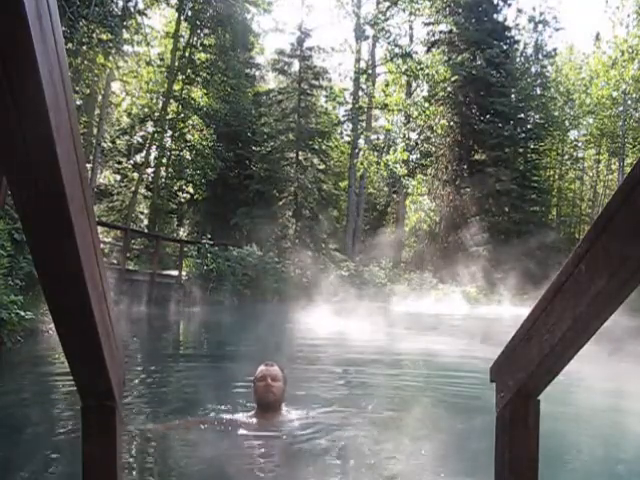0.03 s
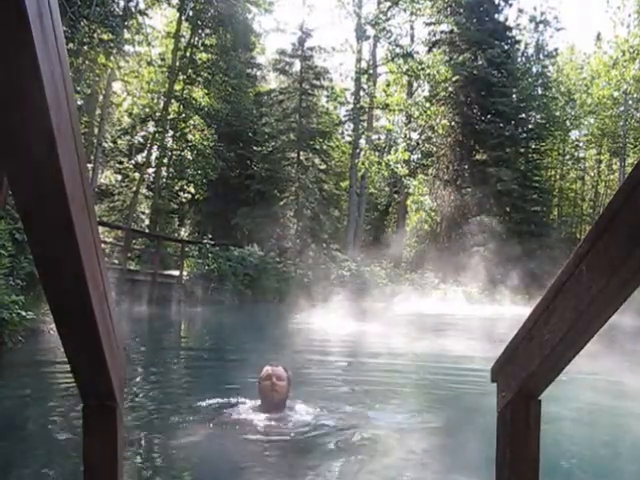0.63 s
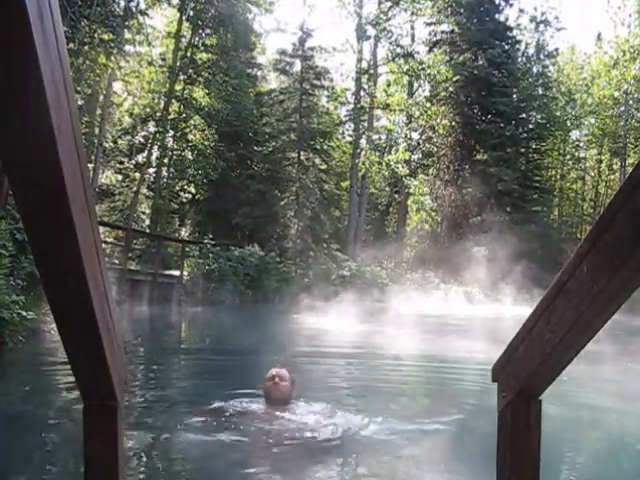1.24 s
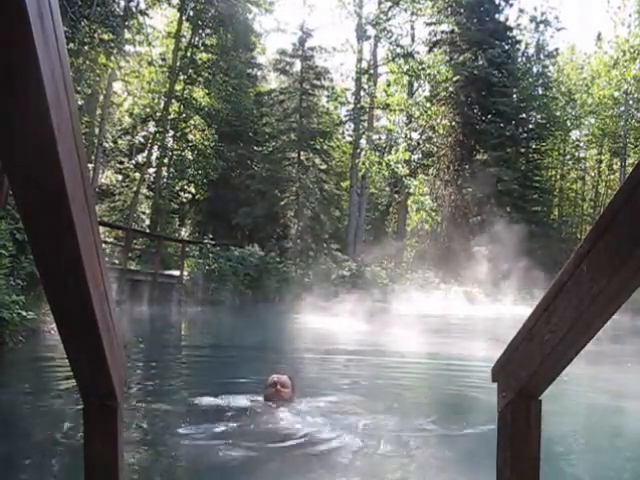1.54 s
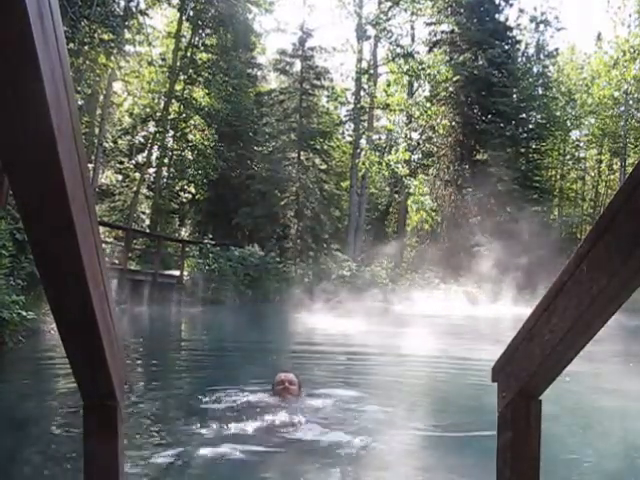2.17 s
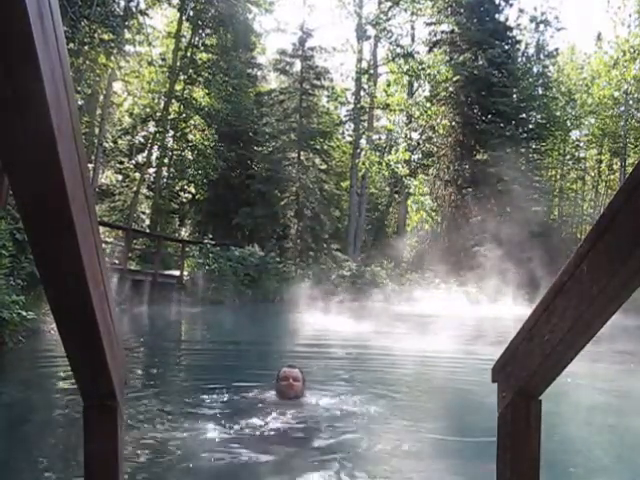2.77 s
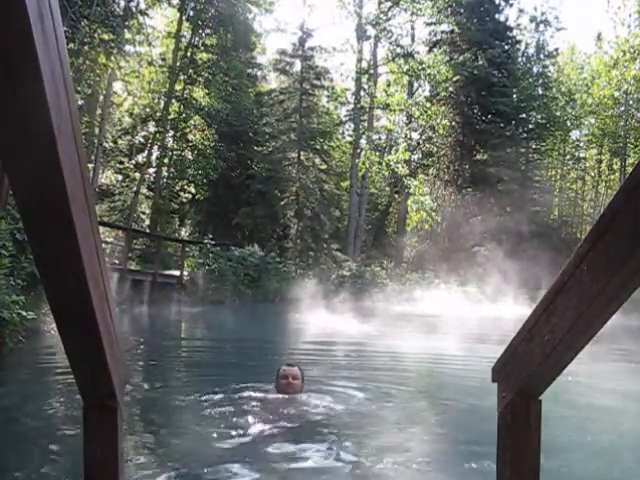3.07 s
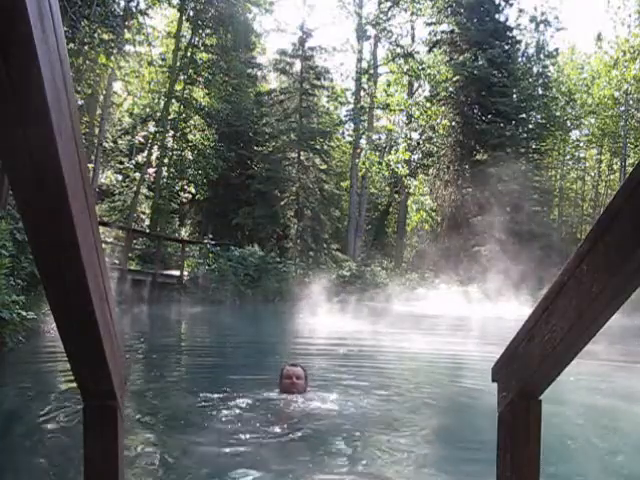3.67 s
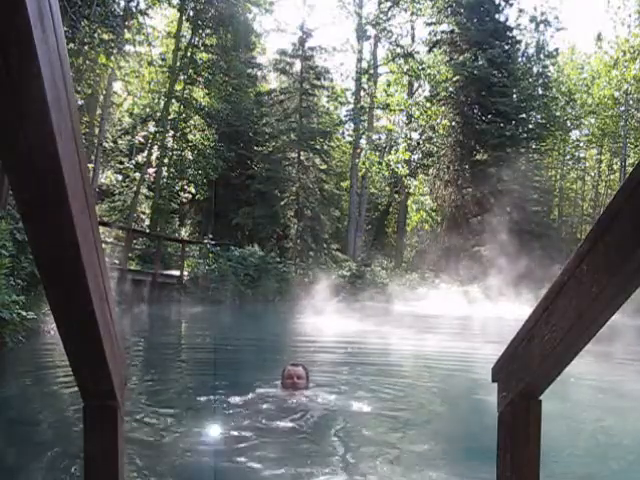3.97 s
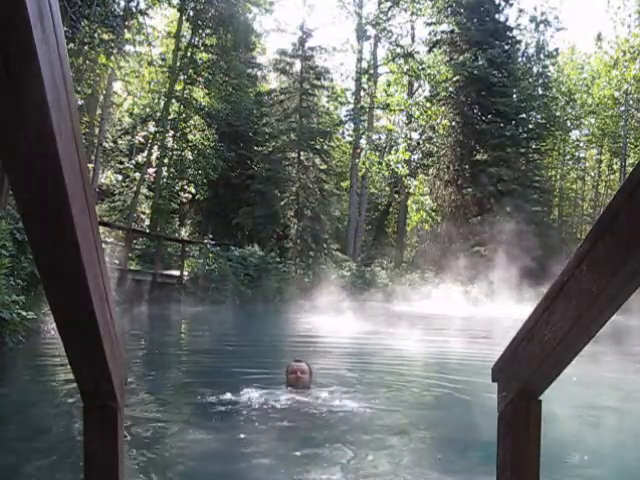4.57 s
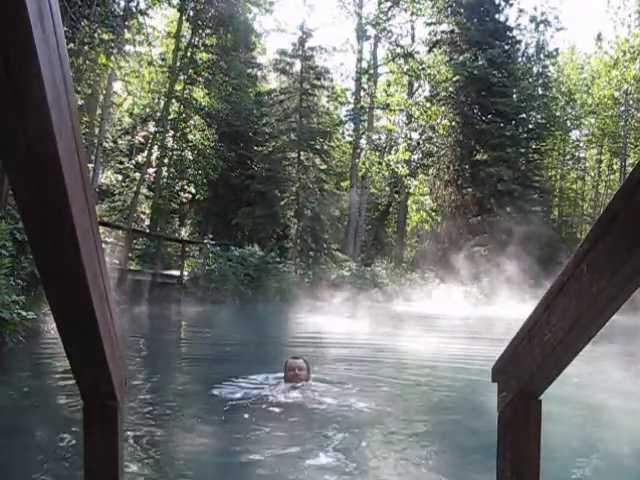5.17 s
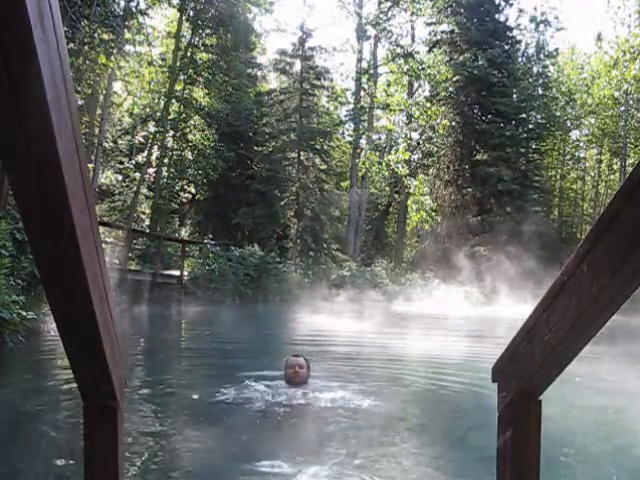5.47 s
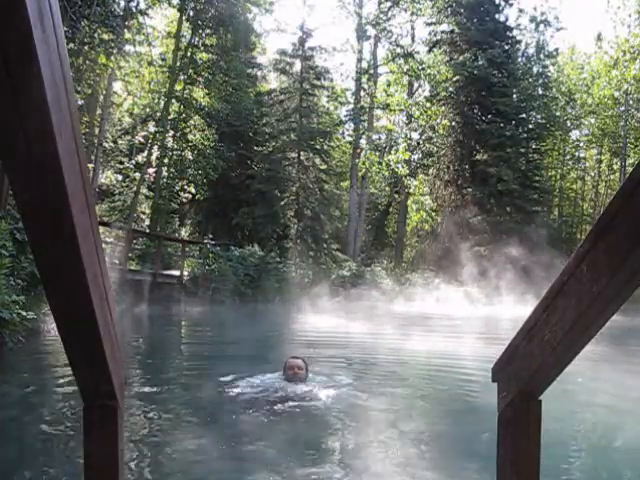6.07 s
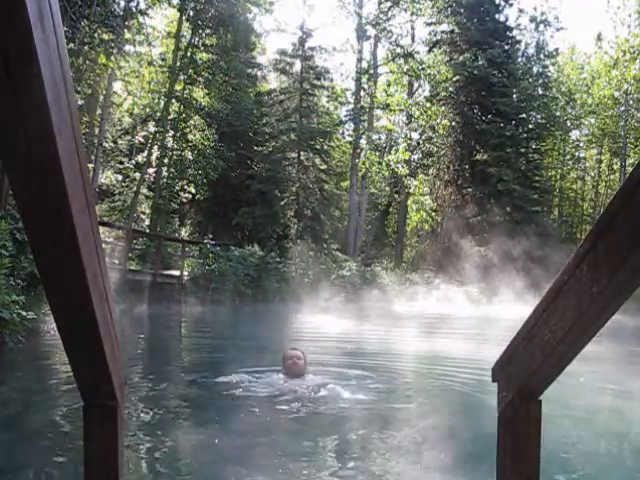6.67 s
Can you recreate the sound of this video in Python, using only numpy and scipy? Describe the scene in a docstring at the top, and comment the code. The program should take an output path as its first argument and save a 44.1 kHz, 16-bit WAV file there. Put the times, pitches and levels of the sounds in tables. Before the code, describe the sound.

A swimmer takes two slow, sloshing strokes in a forest pool while small birds chirp and sing over a soft rush of water.

```python
"""Slow swimming in a forest pool

A swimmer takes two slow strokes in calm water: trapped air rings and gulps, small waves slap, drops tick.
One small bird repeats a sharp two-part chirp, a nearer one bursts into a warbled song, and others call
farther off, all in gliding whistles. The tree trunks scatter every call into a soft echo, over a steady
wash of running water and distant air. The sound is mono."""
import sys
import numpy as np
from scipy import signal
from scipy.fft import rfft, irfft
from scipy.io import wavfile

SR = 44100
rng = np.random.default_rng(int(sys.argv[2]) if len(sys.argv) > 2 else 0)


def store_wav(level_fs):
    """Save 16-bit WAV to argv[1]."""
    pcm = np.round(np.clip(np.atleast_2d(level_fs), -1, 1) * 32767)
    wavfile.write(sys.argv[1], SR, pcm.T.astype(np.int16))


N = 304731
TIME = np.arange(N) / SR

# How hard the arms stir the water, one list for each stroke.
# Each row: time in seconds, slosh strength in dB, spray strength in dB.
STROKES = [
    [(0.85, -54, -81), (0.976, -62, -63.5), (1.164, -48.5, -66), (1.194, -50, -52), (1.226, -49.5, -54.5),
     (1.38, -47.5, -63), (1.412, -53.5, -56), (1.502, -48.5, -60), (1.546, -80, -69), (1.7, -75, -70)],
    [(5.28, -70, -57), (5.37, -52.5, -63), (5.384, -51, -48.5), (5.43, -47, -58), (5.504, -43, -50),
     (5.524, -46.5, -63), (5.554, -36.5, -44.5), (5.62, -48, -60), (5.734, -47, -58), (5.79, -52, -65)],
]
# The small bird's chirps, each a rising whip and then a stutter of pips.
# Each row: whip time in seconds, whip strength in dB, first pip time in seconds, pip strength in dB.
CHIRPS = [(.103, -46, .172, -50), (.286, -37, .353, -37.5), (0.876, -47.5, .94, -51),
          (1.07, -47.5, 1.138, -46), (1.441, -37.5, 1.508, -37.5), (2.185, -35.5, 2.252, -35.5),
          (2.946, -37, 3.015, -38), (3.115, -47.5, 3.18, -49.5), (3.831, -36.5, 3.9, -38),
          (4.066, -52, 4.135, -57), (4.688, -47, 4.76, -49)]


def swimmer():
    """All the water sounds, with their echo. Small pockets of air give off no bass, so it is cut."""
    water = cut_bass(strokes() + bubbles() + slaps() + drops(), 260)
    return water + forest(water, near_db=-10.5, far_db=-12)


def strokes(cycles=14, slosh_gain_db=-1.0, spray_gain_db=0.9, fade_s=0.014):
    """The arms churn up a swarm of small ringing bubbles and a fine spray."""
    # The tone of the slosh and of the spray. Each row: frequency in Hz, boost or cut in dB.
    slosh_tone = [(250, -15), (400, -6.5), (550, 3), (800, -2), (1150, -7), (1900, 0.5), (3000, -6.5),
                  (6000, -16.5)]
    spray_tone = [(3000, 13), (5000, 6), (8000, 9.5), (12000, -2), (15000, 0)]
    swarm = np.zeros(N)
    for hz in np.geomspace(300, 5500, num=30):
        ringing = resonate(clicks(per_s=70, spread_db=4.7), hz, width_hz=2 * hz / cycles)
        swarm += gain_at(slosh_tone, hz) * np.sqrt(hz) * unit_level(ringing)
    slosh = unit_level(swarm)
    spray = unit_level(shape_tone(clicks(per_s=2500, spread_db=5.8), spray_tone))
    out = np.zeros(N)
    for rows in STROKES:
        slosh_db, spray_db = curves_at(rows)
        moving = np.clip(np.minimum(TIME - rows[0][0], rows[-1][0] - TIME) / fade_s, 0, 1)
        out += moving * from_db(slosh_db + slosh_gain_db) * slosh
        out += moving * from_db(spray_db + spray_gain_db) * spray
    return out


def stirred_up(per_s, low_hz, high_hz, spread_db, count=64):
    """Random events as strong as the stroke just then. Each row: seconds, Hz, slosh dB, spray dB."""
    events = []
    for rows in STROKES:
        starts = rows[0][0] + np.cumsum(rng.exponential(1, count)) / per_s
        hz = low_hz * (high_hz / low_hz) ** rng.random(count)
        slosh_db, spray_db = curves_at(rows, starts) + spread_db * rng.standard_normal(count)
        events += [event for event in zip(starts, hz, slosh_db, spray_db) if event[0] < rows[-1][0]]
    return events


def bubbles(rise_octaves=0.16, small_cycles=34, over_slosh_db=7):
    """Each air pocket rings briefly, its pitch rising as it nears the surface."""
    # The largest air pockets closing.
    # Each row: start in seconds, pitch in Hz, strength in dB, seconds to fade by 60 dB.
    large = [(.58, 2160, -40.5, 0.056), (.895, 512, -50, 0.11), (1.181, 2180, -26, 0.012),
             (1.182, 1530, -31, 0.0094), (1.194, 420, -41, 0.047), (1.207, 870, -38, 0.037),
             (1.269, 760, -40, 0.059), (1.302, 1250, -34, 0.031), (1.331, 650, -40, .04),
             (1.366, 875, -36.5, 0.031), (1.491, 1650, -37.5, 0.044), (2.135, 1510, -45.5, 0.046),
             (5.356, 595, -42.5, 0.063), (5.458, 2770, -14, 0.0077), (5.465, 990, -34, 0.033),
             (5.491, 1750, -28.5, 0.016), (5.492, 767, -35.5, 0.1), (5.539, 688, -39, .071),
             (5.547, 1740, -32, .022), (5.579, 522, -40.5, 0.13), (5.646, 500, -39, 0.045),
             (5.72, 726, -31.5, 0.018), (5.723, 522, -41, 0.18)]
    pockets = stirred_up(per_s=26, low_hz=598, high_hz=2950, spread_db=2)
    small = [(start, hz, slosh_db + over_slosh_db, small_cycles / hz) for start, hz, slosh_db, _ in pockets]
    out = np.zeros(N)
    for start, hz, strength_db, fade_s in large + small:
        t = TIME[:int(fade_s * SR) + 2]
        phase = 2 * np.pi * np.cumsum(hz * 2 ** (rise_octaves * t / fade_s)) / SR
        onset = 1 - np.exp(-t / 0.0005)
        add(out, start, from_db(strength_db) * onset * die_away(t, fade_s) * np.sin(phase))
    return out


def slaps(fade_s=0.012, band_ratio=1.52):
    """A small wave hits the swimmer flat: a brief, dull crack."""
    # The slapping waves. Each row: start in seconds, peak level in dB, middle frequency in Hz.
    waves = [(1.182, -29, 1980), (1.194, -38, 604), (1.304, -33, 1270), (1.333, -45, 2000),
             (1.368, -38, 970), (1.492, -43, 1360), (5.387, -28.5, 2220), (5.465, -34, 1110),
             (5.492, -36, 984), (5.574, -23.5, 3000), (5.646, -32, 790)]
    out, t = np.zeros(N), TIME[:SR // 15]
    for start, peak_db, hz in waves:
        crack = band(noise(len(t)) * die_away(t, fade_s), hz / band_ratio, hz * band_ratio)
        add(out, start, from_db(peak_db) * crack / np.abs(crack).max())
    return out


def drops(tick_db=-7, ring_db=-6, over_spray_db=20.5):
    """A drop lands with a short, bright tick and sets a tiny trapped bubble ringing."""
    # The heaviest drops. Each row: start in seconds, strength in dB, pitch of the bubble in Hz.
    heavy = [(.816, -37, 5660), (.982, -35, 10450), (1.075, -42, 9100), (1.181, -37, 7960),
             (1.194, -25.5, 10800), (1.204, -36, 9150), (1.417, -27.5, 12200), (2.191, -40, 12800),
             (2.238, -42, 9560), (5.385, -32, 12400), (5.509, -32, 9300), (5.554, -30, 11000),
             (5.575, -23, 7000), (5.643, -31, 12000), (5.904, -36, 8750), (5.997, -23, 8400),
             (6.104, -36, 10900)]
    drips = stirred_up(per_s=18, low_hz=7500, high_hz=12500, spread_db=5)
    light = [(start, spray_db + over_spray_db, hz) for start, hz, _, spray_db in drips]
    out, t = np.zeros(N), TIME[:SR // 20]
    for start, strength_db, hz in heavy + light:
        tick = from_db(tick_db) * die_away(t, 0.014) * noise(len(t))
        ring = from_db(ring_db) * die_away(t, 0.0039) * np.sin(2 * np.pi * hz * t)
        add(out, start, from_db(strength_db) * (tick + ring))
    return band(out, 2700, 13000)


def chirping_bird(pip_count=4, pip_gap_s=0.009, slowing=0.035):
    """A small bird whistles a rising whip, pauses, then stutters pips that slow a little."""
    # The shape of the whip and of one pip.
    # Each row: seconds before or after its time in CHIRPS, pitch in Hz, boost or cut in dB.
    whip = [(-.015, 3900, -25), (-.004, 5620, -13.5), (-.001, 6280, -3.5), (.001, 6700, -5),
            (.0035, 7100, -16), (.012, 7200, -20)]
    pip = [(-.0035, 4800, 3), (-.0015, 4200, -12.5), (.001, 3883, -2.5), (.003, 4350, -11),
           (.0045, 5400, -12)]
    out = np.zeros(N)
    for whip_s, whip_db, pip_s, pip_db in CHIRPS:
        add(out, whip_s + whip[0][0], from_db(whip_db) * whistle(whip, overtone_db=-30))
        for k in range(pip_count):
            start = pip_s + pip[0][0] + k * pip_gap_s * (1 + slowing * (k - 2))
            add(out, start, from_db(pip_db) * whistle(pip, waver=0.032, overtone_db=-41))
    out += chirp_rasp()
    high_part = band(out, 4320, 7900)   # leaves throw this part back best
    return out + forest(high_part, near_db=-6.5, far_db=-2.5, build_s=0.011)


def chirp_rasp(length_s=0.047, below_pips_db=14.5):
    """A soft rasp of noise lingers above each stutter."""
    out, size = np.zeros(N), int(length_s * SR)
    for _, _, pip_s, pip_db in CHIRPS:
        rasp = unit_level(band(noise(size), 5300, 6360)) * np.hanning(size)
        add(out, pip_s, from_db(pip_db - below_pips_db) * rasp)
    return out


def singing_bird():
    """The near bird sings gliding notes and warbles, heard directly and as an echo from the trees."""
    # The song's notes. Each row: start, first glide length and second glide length in seconds; start,
    # turning and end pitch in Hz; strength and swell in dB; trill depth in Hz; bend (1 is straight).
    notes = [ (4.49, .048, .014, 3100, 3133, 3370, -47.5, 6, -9, 1),
             (4.55, 0.028, 0.028, 3270, 3570, 3200, -45, 8, 228, 0.69),
             (4.706, 0.019, 0.015, 3600, 4500, 4080, -44.5, 11, 0, 1.1),
             (4.712, 0.015, 0.036, 4600, 5520, 5640, -44, 12, 54, 1.6),
             (4.984, 0.028, 0.033, 3190, 2720, 2646, -43.5, 2, 170, 1.1),
             (5.086, .005, 0.0071, 3520, 4230, 3800, -49, 6, 0, 1),
             (5.097, 0.0338, 0.063, 3800, 3108, 3246, -34.5, -1, 102, 1.7),
             (5.256, 0.024, .01, 4080, 5060, 4100, -38, 9, 0, 1.6),
             (5.282, 0.0262, 0.062, 4170, 3910, 3735, -29.5, 1, 8, 1.4),
             (5.372, 0.016, 0.012, 3706, 3680, 3620, -32.5, 0, 0, 0.81),
             (5.297, 0.016, .022, 2760, 2460, 2700, -41.5, -12, 0, 1.25),
             (5.503, 0.023, 0.023, 2825, 2613, 2730, -37, -3, 0, 1.3),
             (5.552, 0.0174, 0.035, 2730, 3243, 2860, -36.5, -9, 240, 0.98),
             (5.675, 0.026, 0.016, 3830, 3896, 3950, -33, 20, 138, 1.2),
             (5.946, 0.012, 0.043, 3150, 3424, 3500, -36, -8, 6, 0.84),
             (5.999, .023, 0.032, 3490, 4606, 3190, -29, 2.5, 24, 1.3),
             (6.051, 0.01, 0.02, 3240, 3154, 3096, -34.5, 14, -16, 1.44),
             (6.198, .032, .028, 2850, 2580, 2760, -39.5, -2, 0, 1.55),
             (6.256, .019, 0.034, 2805, 3290, 2680, -35, -7, 176, 0.89),
             (6.403, 0.018, 0.01, 3680, 4400, 5920, -36, 7, 0, 1.5),
             (6.436, 0.03, 0.055, 5700, 5130, 3600, -30.5, 2.5, 8, 0.64),
             (6.472, .007, 0.0063, 1360, 2860, 1300, -32.5, -4, -3, 0.61),
             (6.502, 0.0052, 0.012, 1420, 2560, 1380, -34, -6, -5, 3.2), ]
    # The pool mirrors the song, making some pitches stronger and others weaker.
    # Each row: frequency in Hz, boost or cut in dB.
    pool_mirror = [(2600, 1.5), (3150, -3.5), (3500, -3.5), (3720, 4.5), (3900, 7.5), (4250, -3.5),
                   (4750, 1.5), (5250, -4), (5800, -1.5), (9000, -1)]
    song = phrase(notes, waver=0.0032) + warbles()
    return from_db(-4.5) * shape_tone(song, pool_mirror) + forest(song, near_db=-8.5, far_db=-11.0)


def warbles(bend=1.8):
    """The singer sweeps up and down between two pitches several times; the lower pitch slides."""
    # Each row is one warble: start, end and time per sweep in seconds; low and high pitch in Hz; fall of
    # the low pitch in Hz per second; share of a sweep spent rising (0 to 1); strength and swell in dB.
    sweeps = [(4.77, 4.894, .0397, 4704, 5520, 4800, .82, -37.5, 3.5),
              (5.721, 5.84, .0395, 4360, 5605, -1200, .3, -30.5, 2.5)]
    out = np.zeros(N)
    for start, end, sweep_s, low_hz, high_hz, fall_hz_per_s, rising, level_db, swell_db in sweeps:
        t = np.linspace(0, end - start, 200)
        height = np.interp(t / sweep_s % 1, [0, rising, 1], [0, 1, 0]) ** bend
        hz = (low_hz - fall_hz_per_s * t) * (1 - height) + high_hz * height
        add(out, start, whistle(note_shape(t, hz, level_db, swell_db), waver=0.0106))
    return out


def far_birds():
    """Birds call from deeper in the trees, where leaves soften the sound that comes straight to us."""
    # The far notes. Each row: start, first glide length and second glide length in seconds;
    # start, turning and end pitch in Hz; strength and swell in dB; trill depth in Hz.
    notes = [ (0.0, 0.085, .1, 2960, 2820, 2850, -65.5, -11, 0),
             (.288, .017, .022, 2940, 2590, 2480, -54.5, -11, 0),
             (.333, 0.058, .17, 2863, 2990, 2860, -55.5, -14, 147),
             (1.12, 0.055, 0.15, 3830, 4350, 4360, -57.5, 3, 260),
             (1.5, 0.13, 0.13, 3980, 3820, 3420, -55.5, -6, 60),
             (1.9, 0.019, 0.019, 2573, 3500, 4190, -47.5, 12, 0),
             (1.941, 0.0052, .012, 4720, 5130, 5400, -44, -2, 0),
             (1.955, 0.027, 0.054, 5150, 5250, 5270, -59, -10, 200),
             (2.278, 0.026, 0.03, 2710, 3780, 3340, -52.5, 4, 0),
             (2.29, 0.026, .042, 7030, 7300, 7200, -58.5, 5, 220),
             (2.365, 0.024, 0.013, 2554, 3070, 2900, -56.5, 4, 200),
             (4.148, .01, .018, 2660, 2770, 2920, -56.5, -6, 150),
             (4.273, 0.029, 0.043, 4680, 4700, 4600, -59, -6, 0),
             (4.345, 0.0197, .017, 2610, 3090, 2900, -59, -2, 0),
             (6.005, 0.024, 0.13, 6400, 6380, 6430, -61.5, -6, 0),
             (6.2, 0.021, .027, 6650, 6300, 6050, -54, -2, 0),
             (6.32, 0.06, 0.049, 4650, 5500, 6800, -53, 1, 0),
             (6.548, 0.036, 0.055, 5300, 6400, 6600, -58, -3, 4),
             (6.68, 0.05, .042, 4940, 5180, 6230, -53, 0, 0),
             (6.83, 0.039, 0.023, 6240, 5300, 4830, -55, 4, 2), ]
    calls = phrase(notes, waver=0.014)
    return from_db(-2.0) * calls + forest(calls, near_db=-6.5, far_db=-5.0)


def phrase(notes, waver):
    """A bird's notes, each at its own time."""
    out = np.zeros(N)
    for start, *shape in notes:
        add(out, start, note(*shape, waver=waver))
    return out


def note(first_s, second_s, start_hz, turn_hz, end_hz, level_db, swell_db, depth_hz, bend=1, waver=0):
    """The bird glides to a turning pitch, then on to its last one."""
    t = np.linspace(0, first_s + second_s, 100)
    first = glide(t / first_s, start_hz, turn_hz, bend)
    second = glide((t - first_s) / second_s, turn_hz, end_hz, bend)
    hz = np.where(t < first_s, first, second)
    return whistle(note_shape(t, hz, level_db, swell_db), depth_hz, waver=waver)


def glide(progress, from_hz, to_hz, bend):
    """A slide in pitch; with a bend over 1 it lingers at its low end."""
    height = np.clip(progress if to_hz > from_hz else 1 - progress, 0, 1)
    return min(from_hz, to_hz) + abs(to_hz - from_hz) * height ** bend


def note_shape(t, hz, level_db, swell_db, open_s=0.0034, close_s=0.0091, edge_db=4.5):
    """A note opens, swells or fades evenly, and closes. Each row: seconds, pitch in Hz, level in dB."""
    opening = np.clip(np.minimum(t / open_s, (t[-1] - t) / close_s), 0, 1)
    return list(zip(t, hz, level_db + swell_db * (t / t[-1] - .5) - edge_db * (1 - opening)))


def whistle(rows, depth_hz=0, waver=0.004, trill_hz=135, overtone_db=-27, edge_s=0.00054):
    """A bird's voice: an almost pure, gliding tone, at times shaken by a fast trill."""
    times = np.array(rows)[:, 0]
    t = np.arange(times.min(), times.max() + edge_s, 1 / SR)
    hz, level_db = curves_at(rows, t)
    trill = depth_hz * np.sin(2 * np.pi * trill_hz * (t - t[0]))
    hz = hz * (1 + waver * wobble(per_s=304.6, size=len(t))) + trill
    level_db = level_db + 0.0261 * trill   # the level pulses in step with the pitch
    phase = 2 * np.pi * np.cumsum(hz) / SR
    fade = np.sin(np.pi / 2 * np.clip(np.minimum(t - t[0], t[-1] - t) / edge_s, 0, 1)) ** 2
    # The throat lets the octave (twice the pitch) through on high notes.
    octave = from_db(overtone_db) * np.clip((hz - 3900) / 600, .15, 1)
    return np.sqrt(2) * fade * from_db(level_db) * (np.sin(phase) + octave * np.sin(2 * phase))


def forest(x, near_db, far_db, build_s=0.0038, near_fade_s=0.15, far_fade_s=0.9):
    """Echoes: nearby trunks scatter a sound quickly, and the wood behind adds a long, soft tail."""
    t = TIME[:SR * 3 // 2]
    trunks = noise(len(t)) * (rng.random(len(t)) < 1500 / SR)   # about 1500 echoes a second
    near = trunks * die_away(t, near_fade_s) * (1 - np.exp(-t / build_s))
    far = noise(len(t)) * die_away(t, far_fade_s) * (1 - np.exp(-t / 0.018))
    echoes = from_db(near_db) * near / np.linalg.norm(near) + from_db(far_db) * far / np.linalg.norm(far)
    return signal.fftconvolve(x, echoes)[:N]


def wash():
    """Far running water and air make a steady rush, with a few soft hums and a high hiss."""
    # The tone of the rush. Each row: frequency in Hz, boost or cut in dB.
    rush_tone = [(53, -23), (90, -13.5), (302, -4), (344, -3.5), (553, -3.5), (617, -3.5), (687, -3),
                 (799, -5.5), (1900, -8), (2740, -9), (4220, -13), (4610, -14), (5360, -15), (12200, -23.5),
                 (15800, -28)]
    # The loudness of the rush, and of the hiss that swells late. Each row: time in seconds, level in dB.
    rush_levels = [(0, -52), (.8, -53.5), (4.8, -54), (6.9, -52.5)]
    hiss_levels = [(0, -79), (4.4, -76), (5.0, -63.5), (5.9, -66), (6.4, -58.5), (6.9, -67)]
    # Low hums in the rush. Each row: pitch in Hz, width in Hz, level in dB.
    hums = [(148, 44, -75), (269.4, 9.7, -72.5), (311.7, 23, -69.5), (788, 65, -68.5)]
    rush = from_db(curves_at(rush_levels)[0]) * unit_level(shape_tone(noise(), rush_tone))
    hum = sum(from_db(db) * unit_level(resonate(noise(), hz, width)) for hz, width, db in hums)
    hiss = from_db(curves_at(hiss_levels)[0]) * unit_level(band(noise(), 5000, 12200))
    return rush + hum + hiss


def from_db(db):
    """Turn decibels (dB) into a number to multiply a sound by."""
    return 10 ** (np.asarray(db) / 20)


def die_away(t, fade_s):
    """A fade that falls by 60 dB in fade_s seconds."""
    return from_db(-60 * t / fade_s)


def unit_level(x):
    """Scale a sound so that its average power is 1."""
    return x / np.sqrt(np.mean(x ** 2) + 1e-20)


def curves_at(rows, t=TIME):
    """Join timed rows with straight lines and read each column at the times t."""
    times, *columns = np.transpose(sorted(rows))
    return [np.interp(t, times, column) for column in columns]


def gain_at(tone, hz):
    """How much a tone table boosts or cuts the given frequencies."""
    table_hz, table_db = np.transpose(tone)
    return from_db(np.interp(np.log(hz + 1e-9), np.log(table_hz), table_db))


def shape_tone(x, tone):
    """Boost and cut a sound's frequencies as a tone table says."""
    return irfft(rfft(x) * gain_at(tone, np.fft.rfftfreq(N, 1 / SR)), N)


def add(out, start_s, sound):
    """Mix a short sound in at its start time."""
    start = int(np.clip(start_s * SR, 0, N - 1))
    out[start:start + len(sound)] += sound[:N - start]


def noise(size=N):
    """An even hiss with all frequencies in it."""
    return rng.standard_normal(size)


def wobble(per_s, size):
    """A curve that slides to a new random value per_s times a second."""
    points = noise(size // 8 + 2)
    return np.interp(np.arange(size) * per_s / SR, np.arange(len(points)), points)


def clicks(per_s, spread_db):
    """Random clicks, many small and a few large."""
    out, count = np.zeros(N), int(per_s * N / SR)
    where, strength, sign = rng.random((count, 3)).T
    level_db = spread_db * np.minimum(-np.log(1 - strength), 4)
    out[(where * N).astype(int)] = from_db(level_db) * np.sign(sign - .5)
    return out


def band(x, low_hz, high_hz):
    """Keep the sound between two frequencies and gently turn down the rest."""
    return signal.sosfilt(signal.butter(2, [low_hz, high_hz], "band", fs=SR, output="sos"), x)


def cut_bass(x, hz):
    """Gently turn down everything below a frequency."""
    return signal.sosfilt(signal.butter(2, hz, "high", fs=SR, output="sos"), x)


def resonate(x, hz, width_hz):
    """Make a sound ring at one pitch; a narrower width rings longer."""
    decay = np.exp(-np.pi * width_hz / SR)
    feedback = [1, -2 * decay * np.cos(2 * np.pi * hz / SR), decay ** 2]
    return signal.lfilter(np.array([1, 0, -1]) * (1 - decay ** 2) / 2, feedback, x + 1e-18)


def scene():
    """Water close by and birds at three depths of the forest, the same in both ears."""
    return np.tile(swimmer() + singing_bird() + chirping_bird() + far_birds() + wash(), (2, 1))


def record(dry, low_cut_hz=45, high_cut_hz=15900):
    """The small microphone loses the deep bass, and the highest treble is cut steeply."""
    treble_cut = signal.ellip(12, .1, 80, high_cut_hz, fs=SR, output="sos")
    return signal.sosfilt(treble_cut, cut_bass(dry, low_cut_hz))


dry = scene()
out = record(dry)
store_wav(out)
```